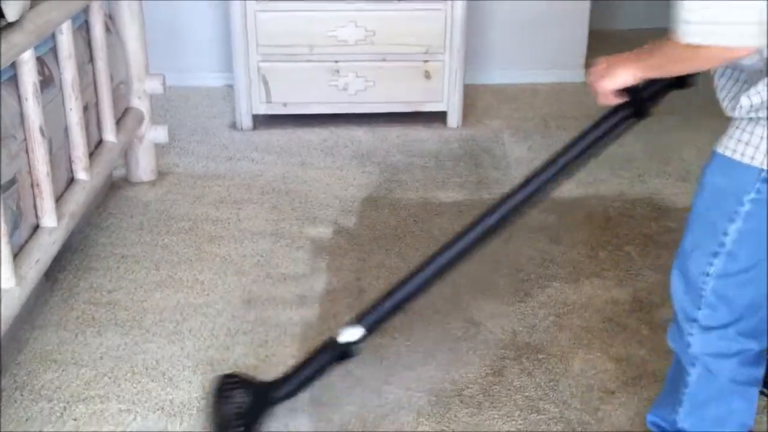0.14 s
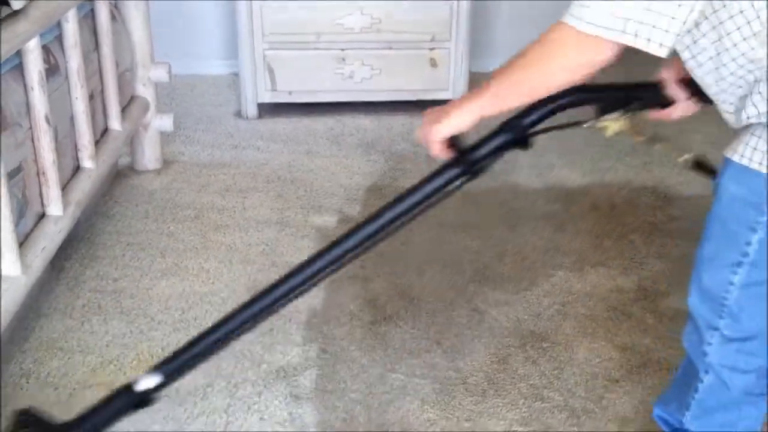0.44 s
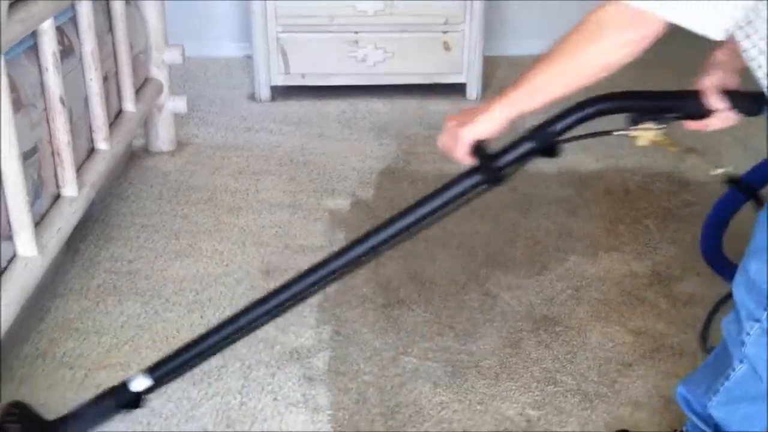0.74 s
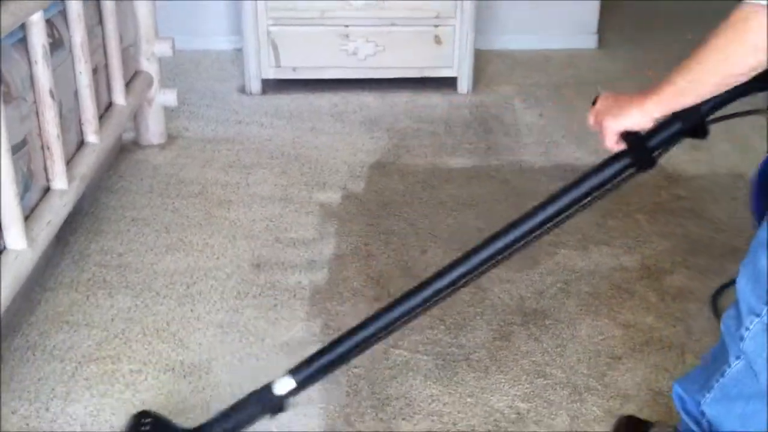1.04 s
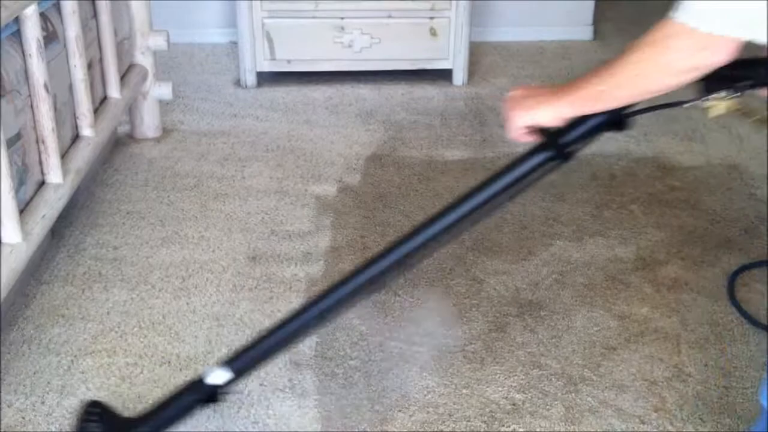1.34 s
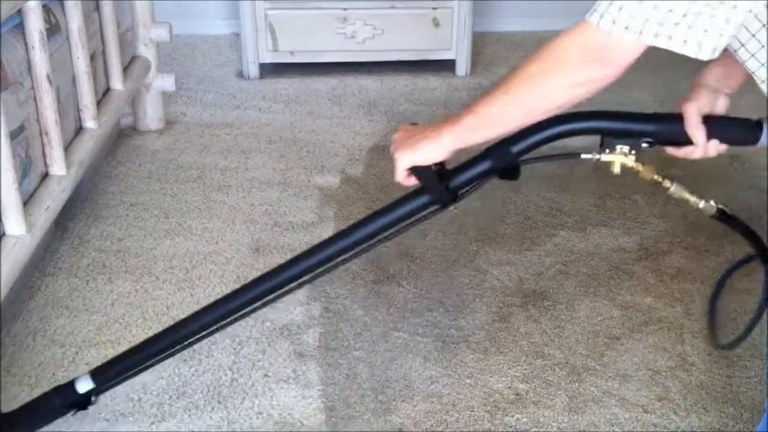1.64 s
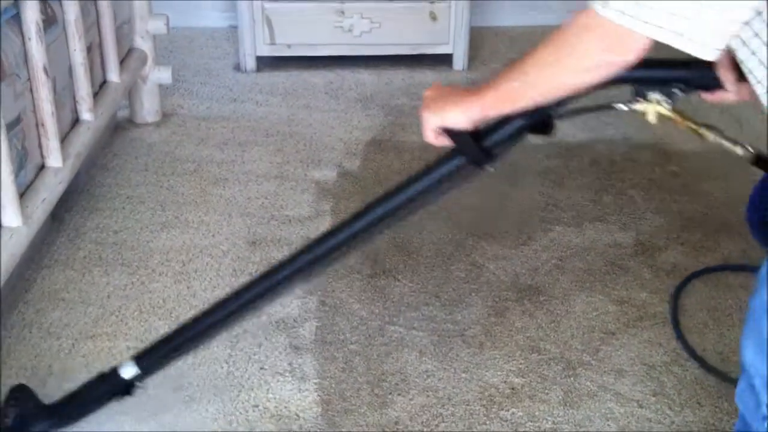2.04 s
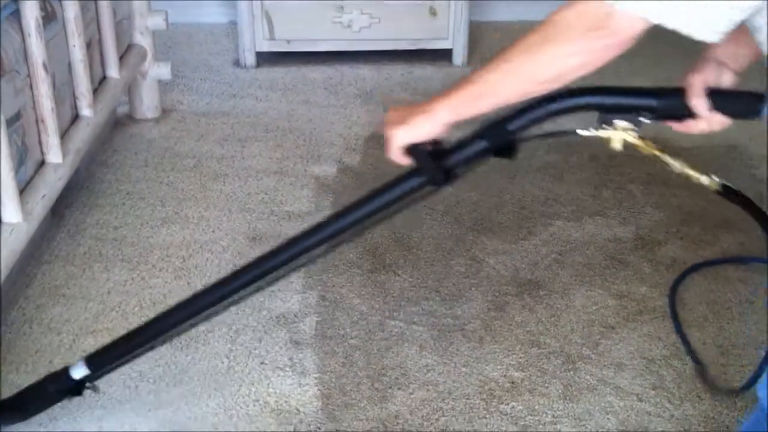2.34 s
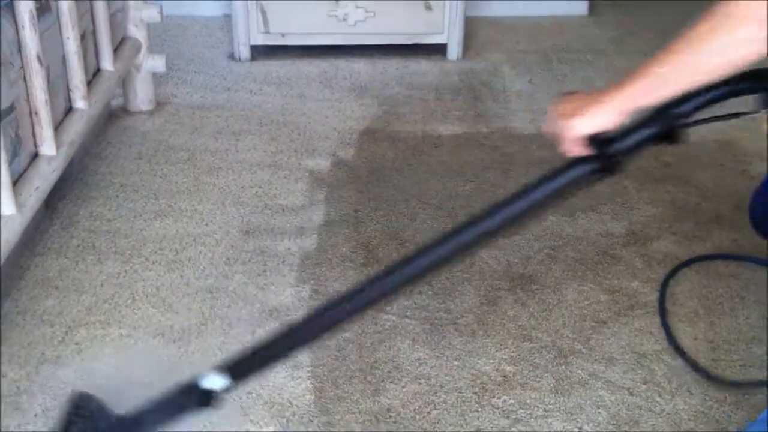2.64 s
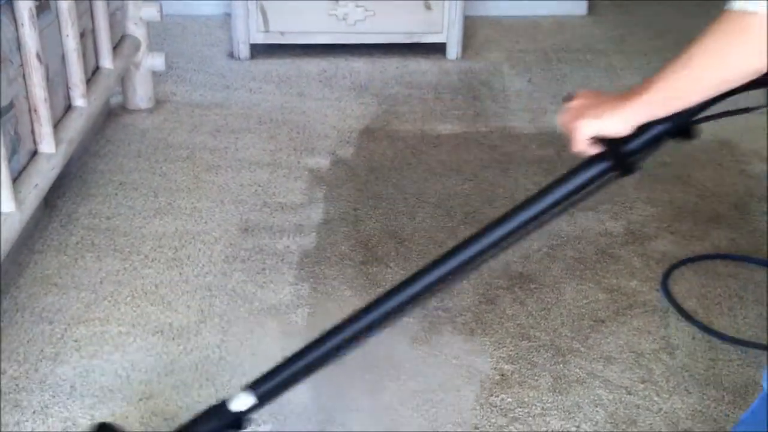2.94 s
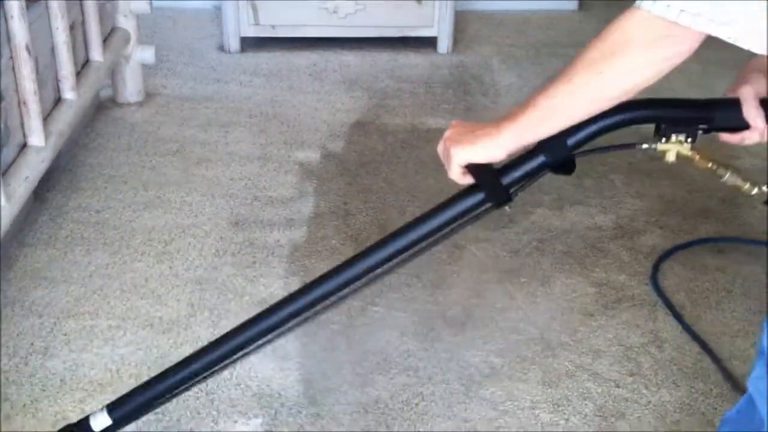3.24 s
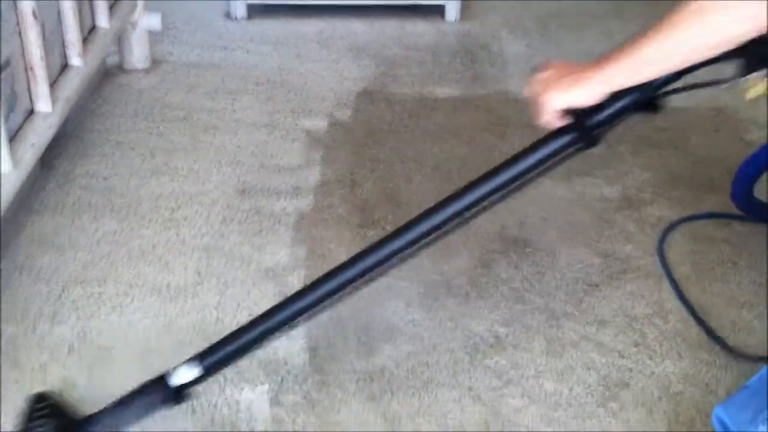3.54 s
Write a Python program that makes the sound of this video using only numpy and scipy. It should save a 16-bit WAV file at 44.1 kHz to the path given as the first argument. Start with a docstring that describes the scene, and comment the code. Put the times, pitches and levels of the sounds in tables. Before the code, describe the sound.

Carpet cleaning suction wand roars and hisses steadily over a droning blower in a bedroom

```python
"""Air roars and hisses around a suction wand working wet carpet in a bedroom, over a pulsing blower.
The lobe blower pulses down the hose and its belt-coupled engine hums far off: sums of cosines.
Air in the tube, leak and slot jet are shaped noise that follows the push and pull of the strokes.
The slot whistles in narrow noise bands, air rushes as the head lifts, and paired sines squeak on the pile.
One mono microphone takes it all, the same on both channels."""
import sys
import numpy as np
from scipy import signal
from scipy.fft import rfft, irfft
from scipy.io import wavfile
from scipy.ndimage import uniform_filter1d

SR = 44100
rng = np.random.default_rng(int(sys.argv[2]) if len(sys.argv) > 2 else 0)


def decibels_to_gain(level_db):
    """Convert a level in decibels to a linear amplitude gain (20 dB per decade)."""
    exponent = np.asarray(level_db, float) / 20
    return 10 ** exponent


def materialize(psi):
    """Save the field psi as 16-bit PCM at rate SR to the path in sys.argv[1].

    A 1-D psi becomes a single channel; in a 2-D psi each row is a channel.
    """
    bounded = np.clip(np.atleast_2d(psi).T, -1, 1)
    quanta = np.round(bounded * 32767).astype(np.int16)
    wavfile.write(sys.argv[1], SR, quanta)


N = 163170  # samples, 3.7 s

# blower heard through the hose: start_s, pulse_hz, first_order_db, second_order_db [s, Hz, dB rms, dB rms]
BLOWER_COURSE = [(0, 286.8, -23, -30.5), (.25, 287.3, -23.5, -28.5), (.45, 286.3, -22, -28),
                 (.7, 286.7, -23, -31.5), (.9, 285.9, -22, -31.5), (1.15, 287, -21.5, -27.5),
                 (1.35, 287, -23.5, -29.5), (1.55, 286.9, -22.5, -27), (1.8, 285.6, -23.5, -28.5),
                 (1.95, 286.3, -23.5, -28.5), (2.25, 287.7, -22, -28), (2.5, 286, -23.5, -30),
                 (2.7, 285.5, -22, -27.5), (3.05, 287.4, -21.5, -27), (3.25, 286.2, -24, -32),
                 (3.4, 286.1, -24, -28.5), (3.55, 285.6, -23, -28.5), (3.7, 286.5, -22, -27)]
# weaker blower orders: multiple_of_pulse_rate, level_db [ratio, dB rms]
UPPER_BLOWER_ORDERS = [(2.5, -49), (3, -49), (3.5, -53), (4, -49), (5, -58), (6, -50), (7, -55), (8, -58)]
# far-off engine: multiple_of_cycle_rate, level_db [ratio, dB rms]
ENGINE_ORDERS = [(2, -78), (3, -54), (5, -53.5), (6, -41), (7, -43.5), (9, -40.5), (11, -50), (13, -46),
                 (15, -43.5), (16, -51), (18, -68.5), (27, -56.5)]
# head dragging over the pile, before the strokes: pitch_hz, level_db [Hz, dB per Hz]
DRAG_SPECTRUM = [(20, -85), (50, -84), (100, -71), (135, -70), (172, -58), (235, -58.5), (330, -61),
                 (390, -63.5), (480, -67.5), (650, -80), (2000, -110)]
# roar of wet air in the tube, before the strokes: pitch_hz, level_db [Hz, dB per Hz]
ROAR_SPECTRUM = [(200, -90), (400, -82), (520, -62), (620, -63), (800, -62), (1000, -63.5), (1300, -66),
                 (1700, -70), (2500, -76), (5000, -110)]
# broad leak of air past the head, before the strokes: pitch_hz, level_db [Hz, dB per Hz]
LEAK_SPECTRUM = [(500, -90), (1200, -67.5), (1700, -65), (2250, -68.5), (2420, -70.5), (2700, -69.5),
                 (2900, -72), (3600, -69), (4200, -73), (5000, -71), (6000, -71.5), (8000, -88),
                 (9600, -75.5), (10500, -78), (12000, -80.1), (13000, -88.5), (14400, -93), (16000, -89)]
# jet through the slot, before the strokes: pitch_hz, level_db [Hz, dB per Hz]
JET_SPECTRUM = [(3000, -95), (5000, -88), (6200, -72), (7000, -70.5), (7450, -66), (7720, -63.5),
                (7800, -58.5), (7870, -63.5), (8050, -65), (8400, -67.5), (9000, -73.5), (10000, -80),
                (13000, -105)]
# air column of the tube: pitch_hz, width_hz, added_db [Hz, Hz, dB of added amplitude, 0 doubles it]
TUBE_MODES = [(385, 20, -2), (432, 15, -3), (645, 16, 0), (803, 22, 1), (935, 16, -3), (1033, 25, -1),
              (1722, 30, -7), (2150, 25, -2), (2250, 20, -2), (9600, 60, -4)]
# strokes of the wand: start_s, drag_db, roar_db, leak_db, jet_db [s, then dB of gain]
STROKES = [(0, -1, -.6, -0.6, 4), (.2, -2.5, -3, -0.5, 2), (.4, 1.2, 3, -0.5, 2.3), (.6, -1, 3.5, -.6, 1.5),
           (.75, -5, -2.5, -0.8, 0.5), (.9, 1.5, 0.5, -.4, 1.2), (1.05, 1.5, 1.6, 0.5, 0),
           (1.2, -1, -0.5, 0, 1), (1.4, -3.5, -.2, -1, 2), (1.6, -0.5, -1, 0.5, -0.5),
           (1.8, -2, -0.5, -1.4, -1.5), (1.98, 3, -1, 1.2, 0), (2.15, -3, -1.5, -0.1, 0.2),
           (2.4, 4, -1.5, 0.1, -0.5), (2.55, .5, -1, -0.5, -1), (2.7, 0, 1, 0.9, 0.2),
           (2.85, 4, 0.7, .6, -.6), (3.05, -5.5, -1, 0, 1.5), (3.25, -.8, .4, 1, -0.5), (3.4, 2, -2, .6, 0),
           (3.55, -6, -2.5, 0.6, 0.5), (3.7, -1, 1.5, 2, 1)]
# edge tones of the slot: pitch_hz [Hz]
SLOT_TONES = [7660, 7784, 7822, 7938, 8367]
# fuzzy slot whistles: start_s, length_s, tone_index, level_db [s, s, from 0, dB rms before the fades]
SLOT_WHISTLES = [(0, 1.4, 1, -42), (.35, .45, 3, -45), (.4, .6, 0, -45), (1.35, .55, 0, -39),
                 (1.3, 1, 1, -42), (1.85, .7, 3, -39), (1.8, .7, 0, -44), (2.4, .2, 4, -42),
                 (2.6, .75, 2, -42), (2.6, .6, 1, -43), (2.65, .6, 3, -45), (3.25, .5, 1, -40),
                 (3.2, .5, 0, -44), (.9, .7, 2, -45), (0, .4, 0, -45)]
# air as the head lifts: centre_s, half_length_s, pitch_hz, width_hz, level_db
# [s, s, Hz, Hz, dB rms before the fades]
LIFT_RUSHES = [(1.98, .055, 3200, 2000, -35)]
# head on wet pile: start_s, length_s, pitch_hz, level_db, partner_db
# [s, s, Hz, dB rms before the fades, dB against the main tone]
PILE_SQUEAKS = [(2.675, .024, 4870, -34, -12), (3.423, .01, 4550, -41, -10), (3.456, .017, 3300, -29, -2),
                (3.474, .016, 3290, -32, -4)]


def read(points, hz):
    """Reads a spectrum table on a log-frequency axis."""
    pitch_hz, level_db = np.transpose(points)
    return np.interp(np.log(hz + 1), np.log(pitch_hz + 1), level_db)


def evened(x):
    """Scales a signal to unit rms."""
    return x / np.sqrt(np.mean(x ** 2) + 1e-20)


def drift(top_hz):
    """Random wander of unit rms, rolled off steeply above top_hz."""
    spectrum = rfft(rng.standard_normal(N))
    hz = np.arange(len(spectrum)) * SR / N
    return evened(irfft(spectrum / (1 + (hz / top_hz) ** 4), N))


def resonate(x, hz, width_hz):
    """Resonance: shifts hz to zero, smooths with a one-pole filter, shifts back."""
    turn = np.exp(2j * np.pi * hz * np.arange(len(x)) / SR)
    pole = np.exp(-np.pi * width_hz / SR)
    return 2 * (turn * signal.lfilter([1 - pole], [1, -pole], x / turn)).real


def add(mix, start_s, sound):
    """Lays a sound into the mix at start_s."""
    part = mix[max(round(start_s * SR), 0):][:len(sound)]
    part += sound[:len(part)]


def air():
    """Turbulent drag, roar, leak and jet: random short-time spectra with drifting patches, led by the strokes."""
    roar_patch_db, hiss_patch_db = .8, .45
    swell_db, swell_hz = .25, 8.9
    frames, hz = N // 512 + 5, np.fft.rfftfreq(2048, 1 / SR)
    real, imag, patches = rng.standard_normal((frames, 1025, 3)).T
    noise = real + 1j * imag
    # patches spread over 20 frequency bins and 8 frames
    patches = uniform_filter1d(patches, size=20, axis=0)
    patches = evened(uniform_filter1d(patches, size=8, axis=1))

    t = np.arange(frames) * 512 / SR
    start_s, *gains_db = np.transpose(STROKES)
    spectra = (DRAG_SPECTRUM, ROAR_SPECTRUM, LEAK_SPECTRUM, JET_SPECTRUM)
    drag, roar, leak, jet = (decibels_to_gain(read(spectrum, hz)[:, None] + np.interp(t, start_s, gain_db))
                             for spectrum, gain_db in zip(spectra, gains_db))
    low = np.hypot(drag, roar) * decibels_to_gain(roar_patch_db * patches)
    high = np.hypot(leak, jet) * decibels_to_gain(hiss_patch_db * patches)
    modes = sum(decibels_to_gain(db) / (1 + (2 * (hz - centre_hz) / width_hz) ** 2)
                for centre_hz, width_hz, db in TUBE_MODES)[:, None]
    shaped = noise * np.hypot(low, high) * (1 + modes)

    # the unshaped noise sets the scale for levels per Hz
    white_rms = signal.istft(noise, nperseg=2048, noverlap=1536)[1].std()
    sound = signal.istft(shaped, nperseg=2048, noverlap=1536)[1][:N]
    return sound / white_rms * np.sqrt(SR / 2) * decibels_to_gain(swell_db * drift(swell_hz))


def machine():
    """Blower pulses and engine orders are locked to one slightly wandering speed by the belt."""
    first_flutter_db, second_flutter_db, flutter_hz = .55, .5, 30
    waver_db, waver_hz = 1.5, 3
    skew_rad = -1.2  # the second order lags, which leans each pulse
    pulses_per_cycle = 11.954  # blower pulses in one engine cycle
    start_s, pulse_hz, first_db, second_db = np.transpose(BLOWER_COURSE)
    t = np.arange(N) / SR
    turn = 2 * np.pi * np.cumsum(np.interp(t, start_s, pulse_hz)) / SR
    first_level = decibels_to_gain(np.interp(t, start_s, first_db) + first_flutter_db * drift(flutter_hz))
    second_level = decibels_to_gain(np.interp(t, start_s, second_db) + second_flutter_db * drift(flutter_hz))
    out = first_level * np.cos(turn)
    out += second_level * np.cos(2 * turn + skew_rad)

    engine = [(order / pulses_per_cycle, db) for order, db in ENGINE_ORDERS]
    for multiple, db in UPPER_BLOWER_ORDERS + engine:
        level = decibels_to_gain(db + waver_db * drift(waver_hz))
        out += level * np.cos(round(multiple, 4) * turn + 2 * np.pi * rng.random())
    return np.sqrt(2) * out  # rms levels to cosine peaks


def whistles():
    """Edge tones of the slot: noise in narrow resonances that swells and fades."""
    out = np.zeros(N)
    for start_s, length_s, tone, db in SLOT_WHISTLES:
        n = round(length_s * SR)
        sound = evened(resonate(rng.standard_normal(n), SLOT_TONES[tone], width_hz=11))
        add(out, start_s, decibels_to_gain(db) * np.sqrt(np.hanning(n)) * sound)
    return out


def rushes():
    """Air rushes in as the head lifts: a short burst of noise through two equal broad resonances."""
    out = np.zeros(N)
    for centre_s, half_s, hz, width_hz, db in LIFT_RUSHES:
        n = round(2 * half_s * SR)
        sound = resonate(rng.standard_normal(n), hz, width_hz)
        sound = evened(resonate(sound, hz, width_hz))
        add(out, centre_s - half_s, decibels_to_gain(db) * np.hanning(n) * sound)
    return out


def squeaks():
    """The head squeaks on wet pile: a short sine with a partner tone close above."""
    partner_ratio = 1.062
    out = np.zeros(N)
    for start_s, length_s, hz, db, partner_db in PILE_SQUEAKS:
        t = np.arange(0, length_s, 1 / SR)
        pair = np.sin(2 * np.pi * hz * t)
        pair += decibels_to_gain(partner_db) * np.sin(2 * np.pi * hz * partner_ratio * t)
        add(out, start_s, decibels_to_gain(db) * np.sqrt(np.hanning(len(t))) * evened(pair))
    return out


def scene():
    """All sources reach one microphone, laid equally on two channels."""
    mono = air() + machine() + whistles() + rushes() + squeaks()
    return np.tile(mono, (2, 1))


def top_cut(x):
    """Nothing passes above the cut-off."""
    return signal.sosfilt(signal.butter(12, 15730, fs=SR, output="sos"), x)


def record(dry):
    """Takes the finished mix from the microphone to the file."""
    return top_cut(dry)


dry = scene()
out = record(dry)
materialize(out)
```